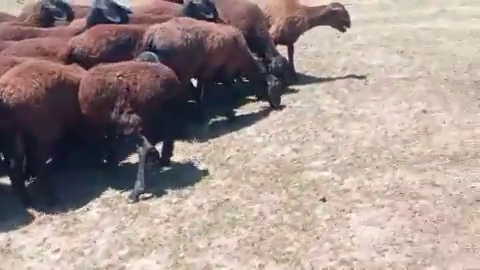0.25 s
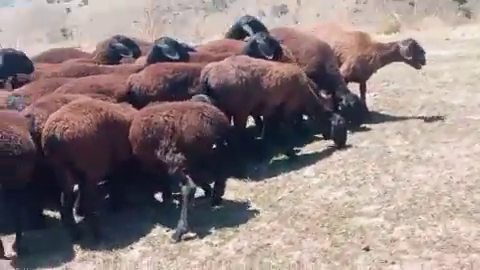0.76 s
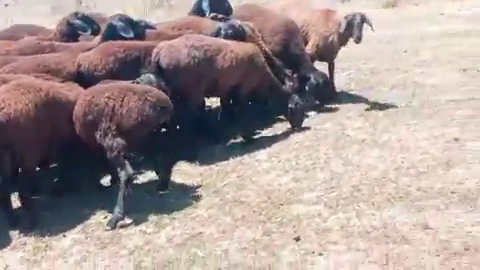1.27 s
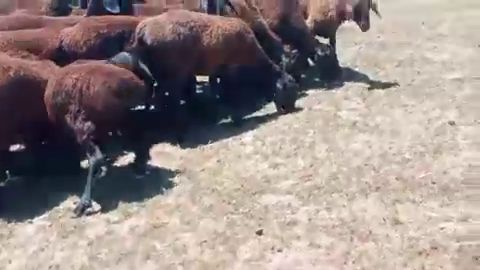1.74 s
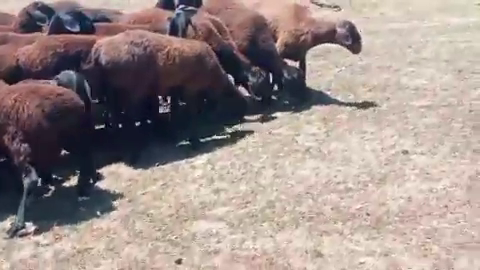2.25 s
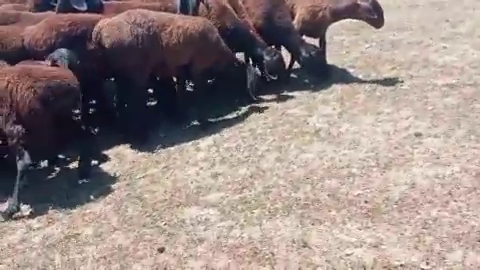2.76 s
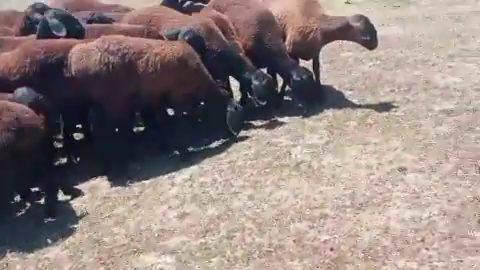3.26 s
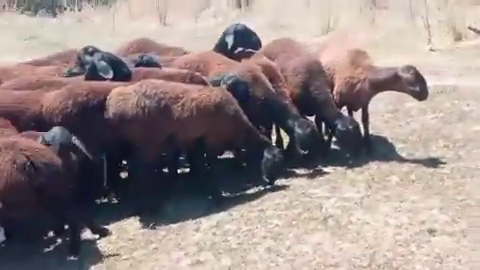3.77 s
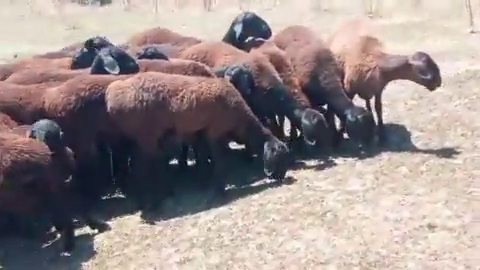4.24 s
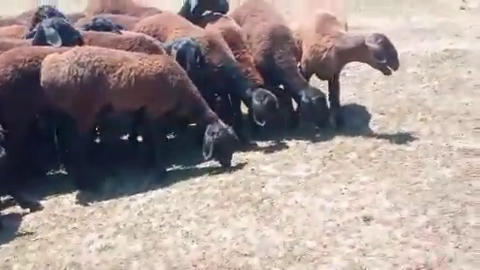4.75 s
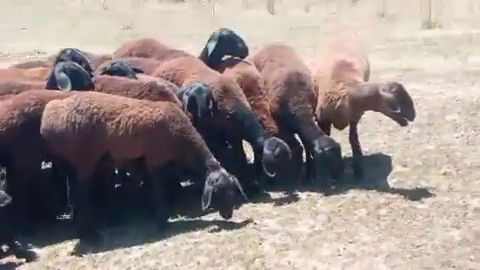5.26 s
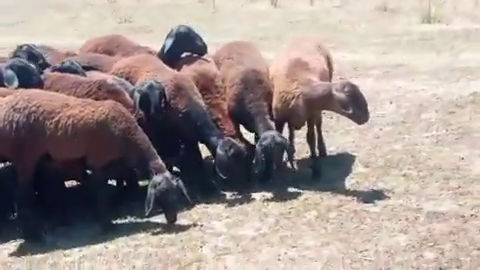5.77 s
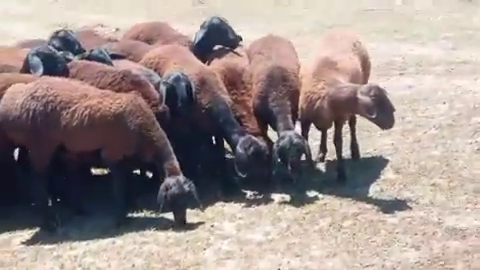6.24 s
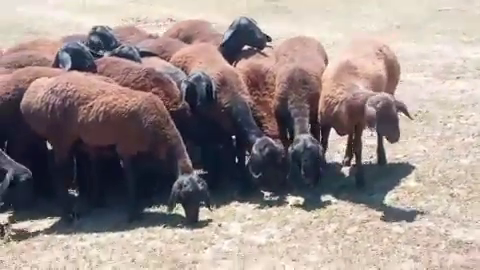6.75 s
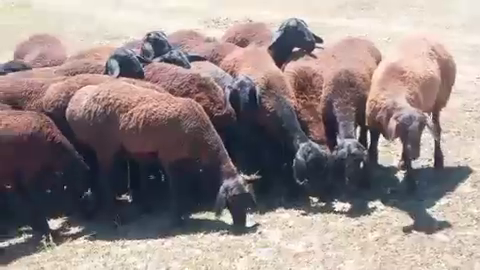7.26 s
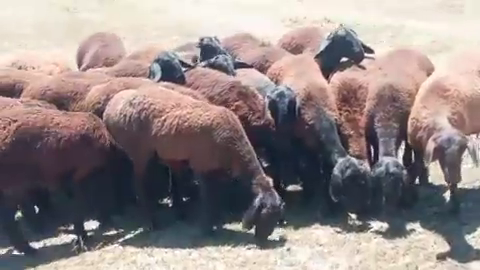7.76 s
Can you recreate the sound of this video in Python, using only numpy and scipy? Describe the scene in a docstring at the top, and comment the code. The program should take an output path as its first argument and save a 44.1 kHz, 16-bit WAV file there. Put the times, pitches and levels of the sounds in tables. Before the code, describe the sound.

In an open dry field, a close young sheep gives a short, nasal bleat that rises, then quavers and sinks. Straw rustles and snaps under hooves while wind thumps softly at the microphone, stronger on the left. Around the middle a second, longer bleat comes, trembling toward its end. Afterward only gusts, faint scuffs and the constant high insect hiss remain.

```python
"""Over a steady hiss of insects a young sheep bleats, close by in a dry, open field, and later bleats again.
Each bleat is a pulse train through gliding resonances: its pitch rises, holds, then quavers and sinks.
Filtered noise gives the insect chorus, the wind gusts on two microphone ports and the rustling straw.
Brief noise bursts give snaps, ticks and scuffs; gliding tones give a far bird, and partials a far call."""
import sys
import numpy as np
from scipy import signal
from scipy.fft import rfft, irfft, next_fast_len
from scipy.io import wavfile
from scipy.ndimage import uniform_filter1d

SR = 44100
rng = np.random.default_rng(int(sys.argv[2]) if len(sys.argv) > 2 else 0)


def to_wav(s):
    """Save 16-bit WAV."""
    ch = np.atleast_2d(s).T  # columns
    pcm = np.round(np.clip(ch, -1, 1) * 32767)  # PCM
    wavfile.write(sys.argv[1], SR, pcm.astype(np.int16))


N = 353241
TIME = np.arange(N) / SR  # s
EDGE_HZ = 15850  # upper band limit


def gain_of(db):
    """Level law: an amplitude ratio is 10 to the power of decibels over 20."""
    return 10 ** (np.asarray(db) / 20)


def evened(x):
    """Normalization: scales a signal to unit rms amplitude."""
    return x / np.sqrt(np.mean(x ** 2) + 1e-20)


def coloured(x, points):
    """Linear filtering: multiplies the spectrum by a gain curve through (hz, level_db) points."""
    point_hz, point_db = np.transpose(points)
    size = next_fast_len(len(x) + 2048)
    hz = np.fft.rfftfreq(size, 1 / SR)
    curve_db = np.interp(np.log(hz + 1), np.log(point_hz), point_db)
    return irfft(rfft(x, size) * gain_of(curve_db), size)[:len(x)]


def wander(size, per_s):
    """Band-limited fluctuation: random knots, per_s each second, joined by lines and scaled to rms 1."""
    knots = rng.standard_normal(8192)
    return evened(np.interp(np.arange(size) * per_s / SR, np.arange(len(knots)), knots))


def add(mix, start_s, sound):
    """Superposition: adds a sound into the mix in place from start_s, cut to fit."""
    start = round(start_s * SR)
    sound = sound[max(-start, 0):]
    part = mix[max(start, 0):][:len(sound)]
    part += sound[:len(part)]


def resonate(x, hz, width_hz):
    """Resonance by heterodyning: shifts hz, fixed or gliding, to zero, smooths there and shifts back."""
    turn = np.exp(2j * np.pi * np.cumsum(hz * np.ones(len(x))) / SR)
    r = np.exp(-np.pi * abs(width_hz) / SR)
    envelope = signal.lfilter([1 - r], [1, -r], x / turn + 1e-18)
    return 2 * (turn * envelope).real


def ports(x, right_colour):
    """Diffraction: sound reaches the right port earlier, phase-bent and shaded by the recorder's body."""
    # extra phase lead at the right port: hz, lead_rad
    port_phase = [(700, 0.53), (1200, 1.0), (1420, 0.1), (1850, 0.83), (2250, 2.26), (2600, -1), (3000, 0),
                  (3400, -0.93), (4000, 0.4), (6000, -0.5), (9000, 2.5)]
    lead_samples = 38
    size = next_fast_len(len(x) + 2048)
    hz = np.fft.rfftfreq(size, 1 / SR)
    lead_rad = 2 * np.pi * hz * lead_samples / SR + np.interp(hz, *np.transpose(port_phase))
    right = irfft(rfft(x, size) * np.exp(1j * lead_rad), size)[:len(x)]
    return np.array([x, coloured(right, right_colour)])


def insects():
    """Incoherent summation: many insects merge into a shimmering noise band, partly shared by the ports."""
    # spectrum of the chorus: hz, level_db
    insect_band = [(3500, -43.5), (4400, -33), (5000, -16.5), (5700, -4), (6700, 2.5), (7400, 0),
                   (8000, -12.5), (9000, -26), (9600, -35), (10500, -49.5)]
    # right port relative to left: hz, level_db
    insect_right = [(4500, -10.5), (5700, -8), (7500, -20), (9000, -0.5)]
    start_db, drift_db_per_s, swell_db = -33, -0.3, 0.32  # slow sinking with a small chance swell
    shimmer_db, spread = -0.5, 1.0  # spread: sound heard at the right port alone, against the shared sound
    level = gain_of(start_db + drift_db_per_s * TIME + swell_db * wander(N, 2.98))

    def chorus():
        """Amplitude modulation: band noise whose level flickers rapidly."""
        noise = rng.standard_normal(N) * gain_of(shimmer_db * wander(N, 170))
        return evened(coloured(noise, insect_band))

    left, right = ports(chorus(), insect_right)
    around = coloured(chorus(), insect_right)
    return level * np.array([left, (right + spread * around) / np.hypot(1, spread)])


def wind():
    """Turbulent pressure: lumpy noise swells in gusts, unrelated at the ports, and eddies thump one port."""
    # gusts: peak_s, half_width_s, left_db, right_db
    gusts = [(1.37, 0.18, -24, -44), (2.17, 0.13, -34.5, -39.5), (2.52, 0.12, -19.5, -70),
             (2.85, 0.19, -29.5, -52), (3.738, 0.21, -29.5, -38.5), (4.22, 0.23, -24.5, -31.5),
             (4.76, 0.25, -15, -29.5), (5.6, 0.29, -38, -50), (5.87, 0.11, -27.5, -40),
             (6.33, 0.15, -33.5, -37), (6.72, 0.23, -40, -45.5), (7.071, 0.072, -40, -31.5),
             (7.66, 0.13, -36.5, -38), (7.929, 0.086, -21.5, -39)]
    # breeze between the gusts, before its dulling filter: left_db, right_db
    calm_db = [-51.5, -62]
    # spectrum of the turbulence: hz, level_db
    rumble_colour = [(20, -51), (40, -18), (70, 0), (110, 1), (160, -7.5), (250, -20), (400, -32.5),
                     (700, -66), (1500, -70.5)]
    # further filter that makes the breeze duller than the gusts: hz, level_db
    calm_colour = [(70, 4), (200, -15.5)]
    # strongest eddies, levels before trim and filter: centre_s, level_db, pitch_hz, port
    eddies = [(0.334, -28, 128, "left"), (1.327, -18, 155, "left"), (1.43, -21, 116, "left"),
              (2.394, -15.5, 101, "left"), (2.54, -9.5, 173, "left"), (2.904, -10, 183, "left"),
              (2.98, -24.5, 127, "right"), (3.747, -12.5, 89, "left"), (4.134, -16, 168, "left"),
              (4.195, -9, 174, "right"), (4.386, -9.5, 150, "left"), (4.624, -10, 189, "left"),
              (4.652, -6.5, 108, "left"), (4.812, -9, 133, "left"), (5.074, -11, 144, "left"),
              (5.311, -17, 136, "left"), (5.589, -14, 108, "left"), (5.656, -16, 123, "left"),
              (5.911, -10.5, 94.4, "left"), (6.233, -17, 155, "left"), (6.596, -16, 131, "left"),
              (7.644, -16.5, 104, "left"), (7.89, -12, 123, "left"), (7.97, -7.5, 114, "left")]
    lumpy_db, eddy_cycles, eddy_trim_db = 6.3, 0.28, -1.0  # flicker depth; time scale and trim of a thump
    power = 0
    for peak_s, half_s, *levels_db in gusts:
        swell = np.exp(-((TIME - peak_s) / half_s) ** 2)
        power = power + (gain_of(levels_db)[:, None] * swell) ** 2

    def rumble_at_port():
        """Intermittency: coloured noise with a randomly flickering level."""
        noise = rng.standard_normal(N) * gain_of(lumpy_db * wander(N, 45))
        return evened(coloured(noise, rumble_colour))

    rumble = np.array([rumble_at_port() for _ in range(2)])
    calm = gain_of(calm_db)[:, None] * np.array([coloured(side, calm_colour) for side in rumble])
    thumps = np.zeros((2, N))
    t = np.arange(-1500, 1500) / SR
    for centre_s, level_db, hz, port in eddies:
        wave = np.cos(2 * np.pi * (hz * t + rng.random())) / np.cosh(t * hz / eddy_cycles)
        add(thumps[int(port == "right")], centre_s + t[0], gain_of(level_db + eddy_trim_db) * wave)
    thumps = np.array([coloured(side, [(20, -17.5), (45, -8), (80, 4), (400, 4)]) for side in thumps])
    ceiling = 0.4  # amplitude at which the capsule rounds off the strongest gusts
    return ceiling * np.tanh((calm + np.sqrt(power) * rumble + thumps) / ceiling)


def patchy(x, depth_db):
    """Time-varying filtering: each hoof rubs other stalks, so the rustle's colour drifts in patches."""
    z = signal.stft(x, nperseg=512)[2]
    patches = uniform_filter1d(rng.standard_normal(z.shape), size=7, axis=0)  # smooth over frequency
    patches = uniform_filter1d(patches, size=12, axis=1)  # smooth over time
    return signal.istft(z * gain_of(depth_db * evened(patches)), nperseg=512)[1][:len(x)]


def shuffling():
    """Power summation of envelopes: each shuffle of the sheep builds, lasts and dies away."""
    # shuffles through the straw: start_s, length_s, level_db
    shuffles = [(-0.06, 0.13, -45), (0.966, 0.15, -56.5), (1.213, 0.55, -47.5), (1.743, 0.41, -47),
                (2.594, 0.33, -53.5), (3.198, 0.36, -48), (5.232, 0.41, -53.5), (5.743, 0.14, -53),
                (6.602, 0.082, -48.5), (7.174, 0.27, -52.5), (7.805, 0.095, -51.5)]
    attack_s, decay_s, floor_db = 0.041, 0.081, -65.5
    power = gain_of(floor_db) ** 2
    for start_s, length_s, level_db in shuffles:
        build = np.clip((TIME - start_s) / attack_s, 0, 1)
        decay = np.exp(-np.maximum(TIME - start_s - length_s, 0) / decay_s)
        power = power + (gain_of(level_db) * build * decay) ** 2
    return np.sqrt(power)


def straw():
    """Shot noise: dry straw crackles in tiny random grains; now and then a stalk snaps and rings briefly."""
    # spectrum of the rustle: hz, level_db
    straw_colour = [(200, -8.5), (550, -2), (900, -5.5), (1300, 2.5), (1600, 6.5), (2100, 4.5), (2700, 2.5),
                    (3400, -2), (4500, 1), (9000, -14), (12500, -36), (14000, -34.5), (15500, -12.5)]
    # right port relative to left: hz, level_db
    straw_right = [(300, -8), (1100, 4.5), (1500, -4), (2000, -14.5), (2600, -9.5), (2900, -17),
                   (3300, -5.5), (5000, -15.5), (7500, -13.5), (11000, 15), (15000, 1.5)]
    # stalks snapping under hooves: start_s, peak_db, centre_hz
    snaps = [(1.86, -32.5, 2020), (1.872, -29, 2080), (1.921, -33.5, 2160), (1.946, -32.5, 2010),
             (1.964, -29.5, 894), (2.03, -29.5, 1260), (2.055, -30.5, 2160), (2.153, -31, 961),
             (2.617, -34, 1060), (2.749, -22, 880), (2.973, -22, 600), (5.594, -34, 1280),
             (6.245, -35, 1250), (6.594, -33.5, 1090)]
    grain_db, grains_per_s = 1.0, 2500  # unevenness and mean rate of the grains
    strength = gain_of(grain_db * np.minimum(rng.exponential(1, N), 5))
    grains = rng.standard_normal(N) * strength * (rng.random(N) < grains_per_s / SR)
    wash = rng.standard_normal(N)  # as strong as the grains
    rustle = evened(patchy(coloured(evened(grains) + wash, straw_colour), depth_db=4.5))
    rustle = rustle * shuffling()
    t = np.arange(1500) / SR
    for start_s, peak_db, hz in snaps:
        burst = rng.standard_normal(len(t)) * np.exp(-t / 0.005)
        snap = coloured(resonate(burst, hz, 1700), [(4000, 0), (11000, -14)])
        add(rustle, start_s, gain_of(peak_db) * snap / abs(snap).max())
    return ports(rustle, straw_right)


def catches(time):
    """Transient perturbation: each catch lowers and roughens the voice; returns (dip Hz, roughness)."""
    # catches, which make the voice quaver: start_s, dip_hz, roughness (0-1)
    catch_table = [(0.388, 21, 0.4), (0.463, 6.5, 0.2), (0.514, 5.2, 0.04), (0.555, 7, 0.27),
                   (0.602, 4.8, 0.31), (0.645, 10, 0.4), (4.37, 5, 0.02), (4.736, 5.1, 0.2),
                   (4.796, 12.6, 0.29), (4.876, 4, 0.25), (4.946, 6, 0.3), (5.079, 10, 0.45)]
    dip_peak_s, rasp_peak_s = 0.018, 0.008  # time to the deepest dip and to the roughest moment
    start_s, dip_hz, rough = np.transpose(catch_table)
    since = np.maximum(time[:, None] - start_s, 0)

    def pulse(peak_s):
        """Critically damped response, squared: a quick rise to 1 at peak_s and a slower fall."""
        return (since / peak_s * np.exp(1 - since / peak_s)) ** 2

    return pulse(dip_peak_s) @ dip_hz, pulse(rasp_peak_s) @ rough


def speak(drive, modes, mouth):
    """Source-filter principle: parallel resonances glide with the mouth; running rms is held at 1."""
    out = np.zeros(len(drive))
    for k, (hz, width_hz, level_db, shift) in enumerate(modes):
        mode = resonate(drive, hz * (1 + shift * mouth), width_hz)
        out += (-1) ** k * gain_of(level_db) * mode  # alternate modes have opposite sign
    return out / np.sqrt(abs(uniform_filter1d(out ** 2, size=900)) + 1e-12)


def bleat(row, throat, open_treble_db, shut_treble_db):
    """Self-oscillation: pulses of the vocal folds ring a throat whose resonances move with the mouth."""
    # colour of the main voice: hz, level_db
    voice_colour = [(200, 3), (900, 0), (1150, -1.5), (1350, -5), (1600, 3), (1850, 5.5), (2020, -5.5),
                    (2250, 6), (2480, -9), (2800, -1), (3400, -0.5), (4600, -6.5), (6000, -35.5),
                    (10000, -36)]
    # resonances of the bright edge: hz (mouth shut), width_hz, level_db, shift (share moved at full opening)
    high_throat = [(5270, 240, -6, -0.029), (5685, 180, -4, 0.083), (6664, 240, 2.5, 0.026),
                   (7570, 270, -1, -0.022), (8830, 310, -6, -0.072), (11540, 3400, -11, 0.01),
                   (15300, 600, -8, 0.01)]
    # band of the bright edge: hz, level_db
    high_band = [(3000, -20.5), (4900, 4), (7600, -1.5), (9300, 0), (10300, -12.5), (14000, -22),
                 (15400, -13.5)]
    # steady air at the very top of the voice: hz, level_db
    top_air = [(7500, -22), (10500, -7)]
    rise_s, rise_curve, drop_hz_per_s = 0.1, 1.3, 400
    attack_s, release_s, weak_db = 0.041, 0.027, -7.5  # the voice starts weak_db down
    rough_held, rough_slack, rough_per_s = 0.07, 0.45, 0.15  # taut folds; slack folds add; tiring adds
    mouth_start, mouth_wide_at = 0.12, 0.86  # first opening 0-1; share of the bleat until wide open
    treble_rise_s, treble_fall_s, treble_slack_db = 0.074, 0.07, -11
    air, shimmer, jitter = 0.5, 0.3, 0.024  # per roughness: breath, uneven pulse strength, uneven timing
    flutter = 0.0015  # slower share of pitch that always wavers
    closing_spread = 0.025  # rad by harmonic number squared: the folds do not meet all at once
    start_s, length_s, top_db, start_hz, top_hz, held_s, sag_hz_per_s, drop_s, fade_db_per_s = row
    t = np.arange(0, length_s, 1 / SR)
    # the push builds, holds, tires and gives out; pitch, effort and roughness follow it
    push = 1 - np.exp(-(t / rise_s) ** rise_curve)
    tired_s = np.maximum(t - held_s, 0)
    spent_s = np.maximum(t - length_s + drop_s, 0)
    dip_hz, rasp = catches(start_s + t)
    hz = start_hz + (top_hz - start_hz) * push - sag_hz_per_s * tired_s
    hz = hz - drop_hz_per_s * spent_s - dip_hz
    effort_db = top_db + weak_db * (1 - push) - fade_db_per_s * tired_s
    effort_db = effort_db - 0.07 * dip_hz  # dB lost per Hz of dip
    rough = rough_held + rough_slack * (1 - push + spent_s / drop_s) + rough_per_s * tired_s + rasp
    mouth = np.interp(t, [0, mouth_wide_at * length_s], [mouth_start, 1])
    # strained folds beat unevenly in timing and strength
    hz = hz * (1 + jitter * rough * wander(len(t), 260) + flutter * wander(len(t), 60))
    turns = np.cumsum(hz) / SR
    folds = np.zeros(len(t))
    for k in range(1, 90):
        folds += np.cos(2 * np.pi * k * turns - closing_spread * k * k) * (k * hz < EDGE_HZ)
    folds = evened(folds) * (1 + shimmer * rough * wander(len(t), 300))
    # air rushes through once a cycle
    puff_shape = 0.25 + np.exp(-(turns % 1) / 0.25)
    puffs = evened(puff_shape * rng.standard_normal(len(t)))
    puffs = coloured(puffs, [(500, -2), (3000, 2), (7000, 3), (14000, 10)])
    drive = folds + air * rough * puffs
    # the opening sets how much treble escapes; the folds snap shut sharply only in mid-call
    slack = np.interp(t, [0, treble_rise_s, length_s - treble_fall_s, length_s], [1, 0, 0, 1])
    treble_db = shut_treble_db + (open_treble_db - shut_treble_db) * mouth + treble_slack_db * slack
    main = speak(coloured(drive, voice_colour), throat, mouth)
    bright = speak(coloured(drive + coloured(puffs, top_air), high_band), high_throat, mouth)
    gate = np.interp(t, [0, attack_s, length_s - release_s, length_s], [0, 1, 1, 0]) ** 2
    return start_s, gain_of(effort_db) * gate * (main + gain_of(treble_db) * bright)


def field(x, t60_s, wet_db):
    """Sparse scattering: ground and flock return weak, decaying random echoes, different at each port."""
    t = np.arange(SR // 2) / SR
    struck = rng.random((2, len(t))) < 0.05
    taps = rng.standard_normal((2, len(t))) * struck * gain_of(-60 * t / t60_s) * (t > 0.004)
    taps = taps / np.linalg.norm(taps[0])
    return gain_of(wet_db) * signal.fftconvolve(x[None], taps, axes=1)[:, :N]


def sheep():
    """Voiced and unvoiced sources: two bleats and small mouth noises, with a short outdoor tail."""
    # bleats: start_s, length_s, effort_db, start_hz, top_hz, held_s, sag_hz_per_s, drop_s, fade_db_per_s
    bleat_table = [(0.03, 0.7496, -16.5, 141.5, 236, 0.35, 83.6, 0.108, 16),
                   (4.2, 1.0016, -16, 159.2, 225.4, 0.38, 52.22, 0.078, 7)]
    # throat resonances: hz (mouth shut), width_hz, level_db, shift (share moved at full opening)
    first_throat = [(231, 1100, -24.5, 0.011), (674, 46.3, 2.5, 0.053), (1913, 155, -3, -0.16),
                    (2447, 88, -4, -0.063), (2583, 127, -1.5, 0.002), (3290, 153, -2.5, -0.066),
                    (3948, 84, 3, -0.039), (4536, 140, -6, -0.03)]
    # the same columns for the second bleat
    second_throat = [(230, 780, -19.5, 0.0045), (718, 53.3, 6.5, 0.038), (1837, 134, 0.5, -0.11),
                     (2080, 30, -10.5, -0.012), (2772, 136, 9.5, 0.037), (3463, 62, -2, -0.012),
                     (3987, 90, 5.5, -0.026), (4620, 37, 3.5, -0.03), (5190, 124, 10, 0.0044)]
    # noises of the mouth opening and shutting: start_s, length_s, level_db, centre_hz, width_hz
    mouth_noises = [(4.134, 0.055, -45, 1000, 350), (4.13, 0.07, -47, 2840, 600),
                    (4.21, 0.018, -33, 5960, 1470), (5.208, 0.022, -43, 680, 900)]
    # right port relative to left: hz, level_db
    voice_right = [(200, -5.5), (700, -2), (1150, -3), (1350, 4), (1800, -3.5), (2150, -6.5), (2500, 2),
                   (2850, -8), (3300, 0.5), (4000, -10.5), (5200, -11), (5800, -11.5), (7500, -23.5),
                   (9200, -5), (15000, -5.5)]
    voice = np.zeros(N)
    add(voice, *bleat(bleat_table[0], first_throat, open_treble_db=-3.5, shut_treble_db=-21.5))
    add(voice, *bleat(bleat_table[1], second_throat, open_treble_db=-9, shut_treble_db=-13))
    for start_s, length_s, level_db, hz, width_hz in mouth_noises:
        noise = rng.standard_normal(round(length_s * SR))
        puff = resonate(resonate(noise, hz, width_hz), hz, width_hz)
        add(voice, start_s, gain_of(level_db) * evened(puff * np.hanning(len(puff))))
    return ports(voice, voice_right) + field(voice, t60_s=0.16, wet_db=-18)


def far_animals():
    """Frequency modulation and harmonic synthesis: a far bird's gliding whistles and a low, sagging call."""
    # bird whistles: start_s, length_s, start_hz, end_hz, arch_hz, level_db
    whistles = [(2.196, 0.066, 3200, 3780, 100, -58), (2.235, 0.11, 3600, 3460, 397, -50),
                (2.412, 0.095, 3000, 2300, 15, -67), (2.814, 0.11, 3680, 3700, 500, -57),
                (3.608, 0.11, 4300, 3820, 0, -59), (3.775, 0.13, 3600, 2860, -69, -61.5)]
    # course of the low call: time_s, pitch_hz, level_db
    far_call = [(1.15, 91.4, -79), (1.28, 88.5, -70.5), (1.55, 88.3, -67.5), (1.75, 87.8, -69.5),
                (1.92, 84.7, -79)]
    # its strong partials: multiple of the pitch, level_db
    far_partials = [(6, -2), (10, -9), (12, -9), (14, -7), (15, -2), (20, -6)]
    out = np.zeros(N)
    for start_s, length_s, start_hz, end_hz, arch_hz, level_db in whistles:
        u = np.linspace(0, 1, round(length_s * SR))
        hz = start_hz + (end_hz - start_hz) * u + arch_hz * np.sin(np.pi * u)
        hz = hz * (1 + 0.021 * wander(len(u), 280))
        tone = np.sin(2 * np.pi * np.cumsum(hz) / SR)
        add(out, start_s, 2 * gain_of(level_db) * np.hanning(len(hz)) * tone)
    time_s, pitch_hz, level_db = np.transpose(far_call)
    hz = np.interp(TIME, time_s, pitch_hz) * (1 + 0.00886 * wander(N, 30.4))
    turns = np.cumsum(hz) / SR
    call = sum(gain_of(part_db) * np.sin(2 * np.pi * k * turns) for k, part_db in far_partials)
    call = call * gain_of(np.interp(TIME, time_s, level_db, left=-200, right=-200))
    return ports(out + call, [(1300, 15), (3000, -11)])


def ticks():
    """Impulsive contact: thin dry stalks click together as bright, fast-decaying noise bursts."""
    # ticks: start_s, peak_db
    tick_table = [(1.61, -43), (2.392, -36.5), (2.975, -33.5)]
    # spectrum of a tick: hz, level_db
    tick_colour = [(3000, -25), (7000, 2), (12000, -4), (15500, -6)]
    out = np.zeros(N)
    t = np.arange(1500) / SR
    for start_s, peak_db in tick_table:
        burst = rng.standard_normal(len(t)) * np.exp(-t / 0.0023)
        tick = coloured(burst, tick_colour)
        add(out, start_s, gain_of(peak_db) * tick / abs(tick).max())
    return ports(out, [(1000, 8.5)])


def scuffs():
    """Friction noise: close, short, gritty rubs start fast and fade."""
    # scuffs: start_s, length_s, level_db
    scuff_table = [(5.744, 0.25, -47), (6.318, 0.22, -34.5), (6.505, 0.31, -50.5), (7.179, 0.42, -46.5),
                   (7.848, 0.21, -54.5)]
    # spectrum of the grit: hz, level_db
    scuff_colour = [(150, -22.5), (450, 8.5), (800, 3), (1400, 0.5), (2100, -2), (3200, -3), (4500, -1.5),
                    (9000, -11.5), (12500, -27.5), (15500, -9)]
    grain_db, grains_per_s = 4.5, 500  # unevenness and fineness of the grit
    noise = rng.standard_normal(N) * gain_of(grain_db * wander(N, grains_per_s))
    grit = evened(coloured(noise, scuff_colour))
    level = np.zeros(N)
    for start_s, length_s, level_db in scuff_table:
        u = (TIME - start_s) / length_s
        level += gain_of(level_db) * np.interp(u, [0, 0.15, 0.55, 1], [0.0072, 0.96, 0.3, 0.0011])
    return ports(grit * level, [(1000, -3.5)])


def scene():
    """Superposition: the sound pressures of all sources add at the two ports."""
    return insects() + wind() + straw() + sheep() + far_animals() + ticks() + scuffs()


def record(dry):
    """Band limitation: a linear-phase low-pass filter sets the recorder's upper edge."""
    low_pass = signal.firwin(511, EDGE_HZ, window=("kaiser", 9), fs=SR)
    return signal.oaconvolve(dry, low_pass[None], "same")


dry = scene()
out = record(dry)
to_wav(out)
```